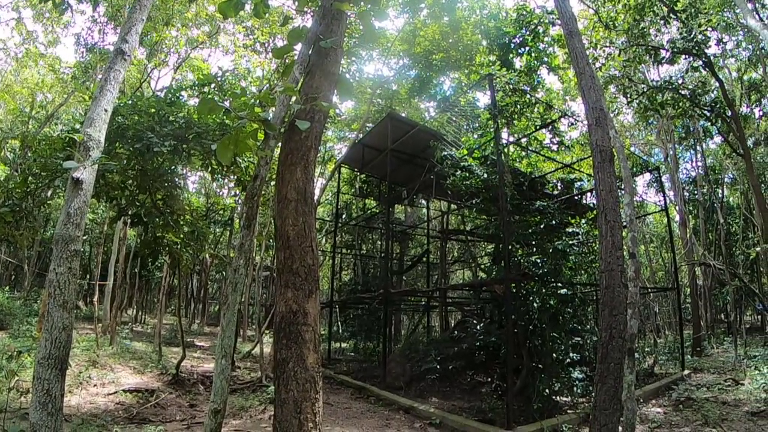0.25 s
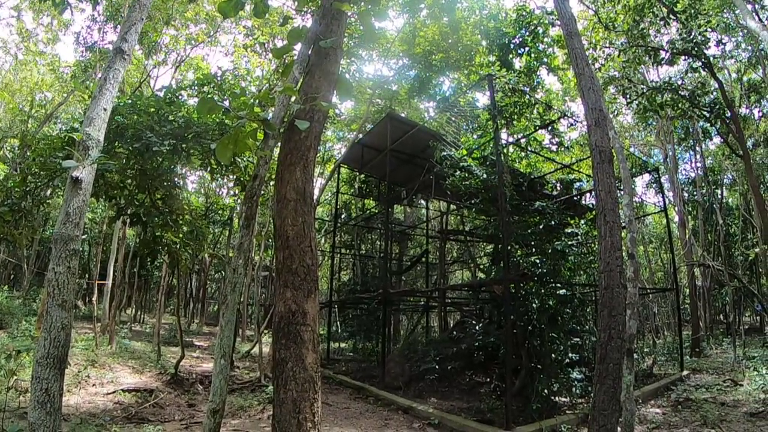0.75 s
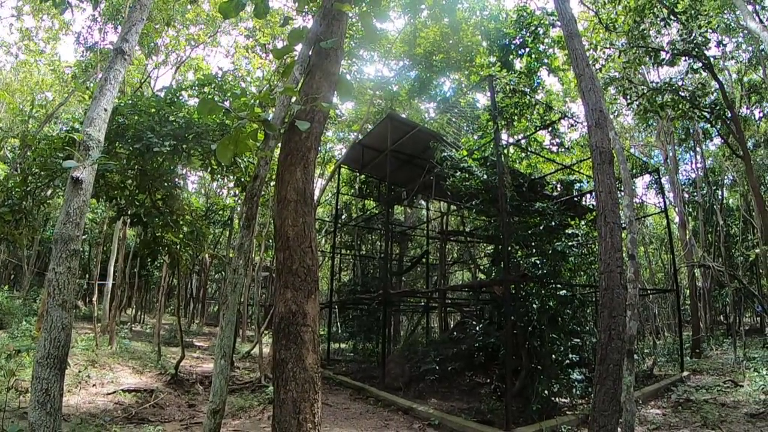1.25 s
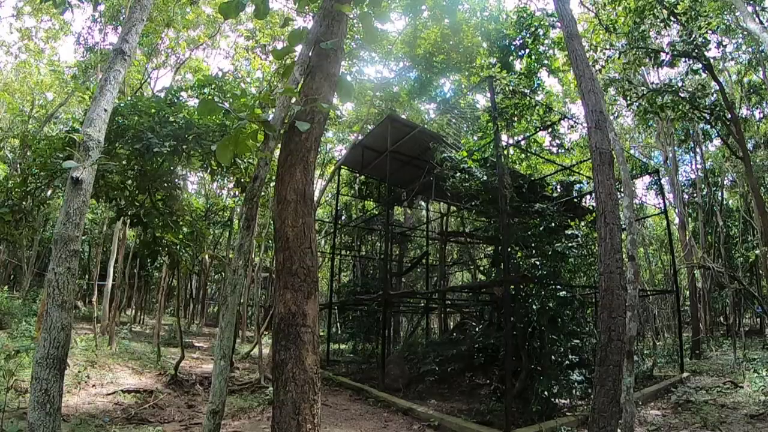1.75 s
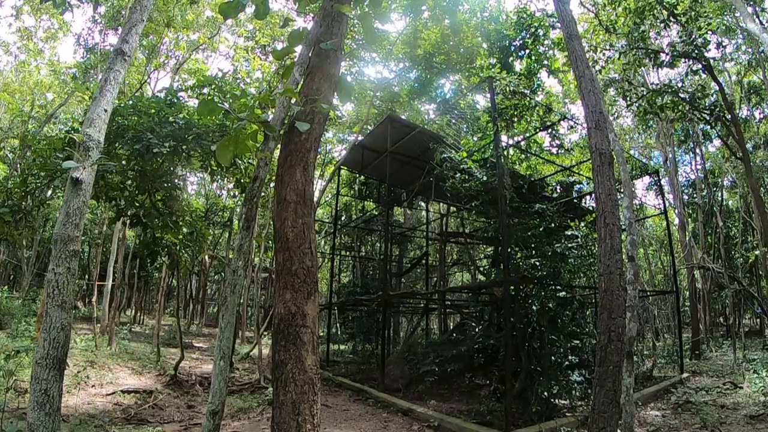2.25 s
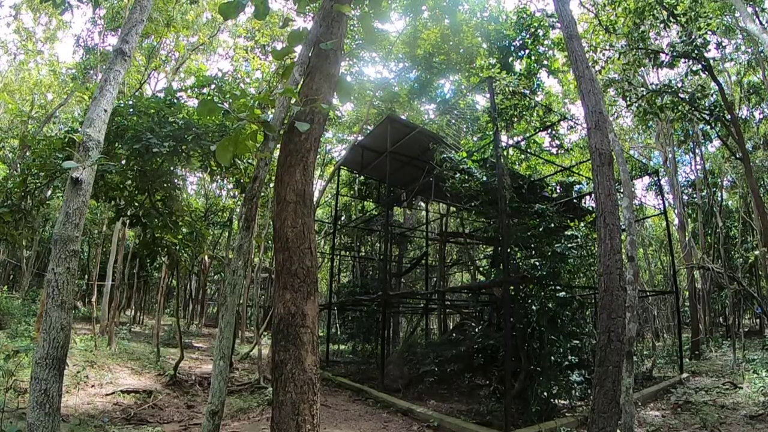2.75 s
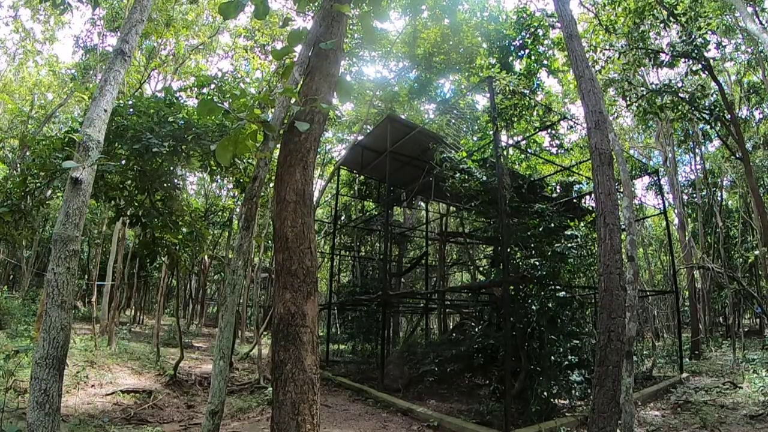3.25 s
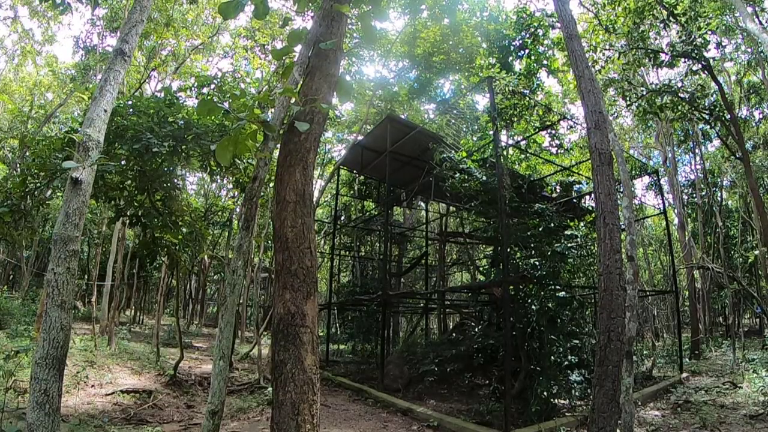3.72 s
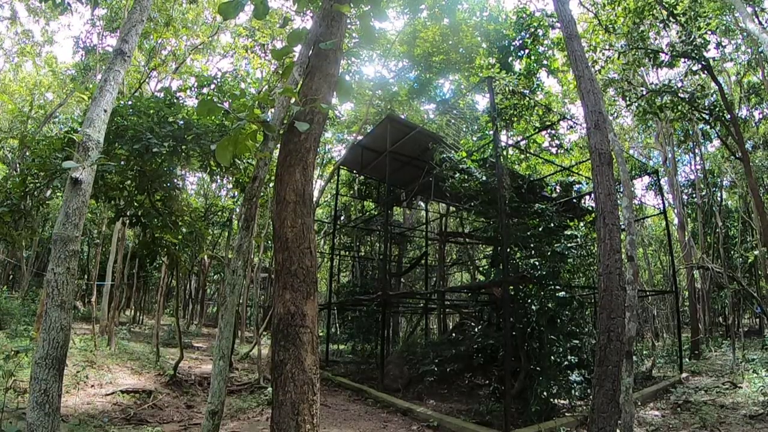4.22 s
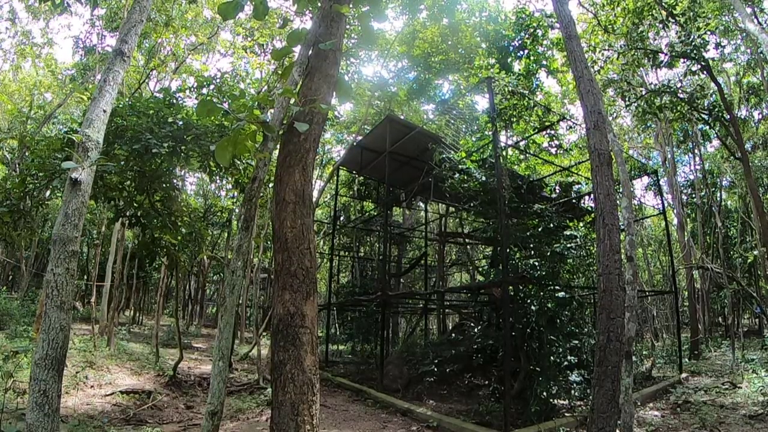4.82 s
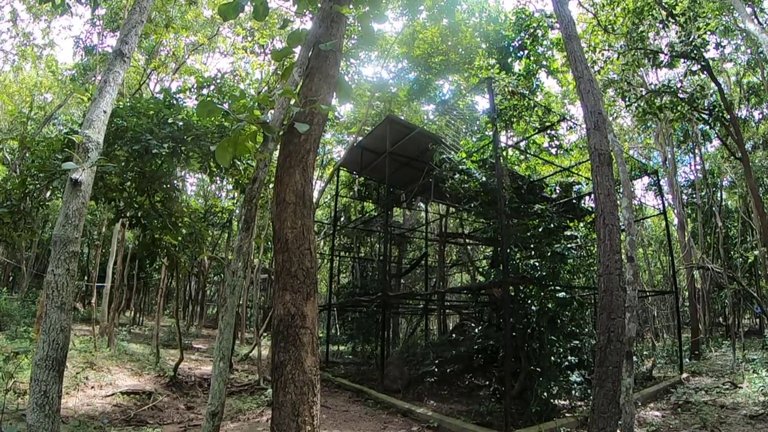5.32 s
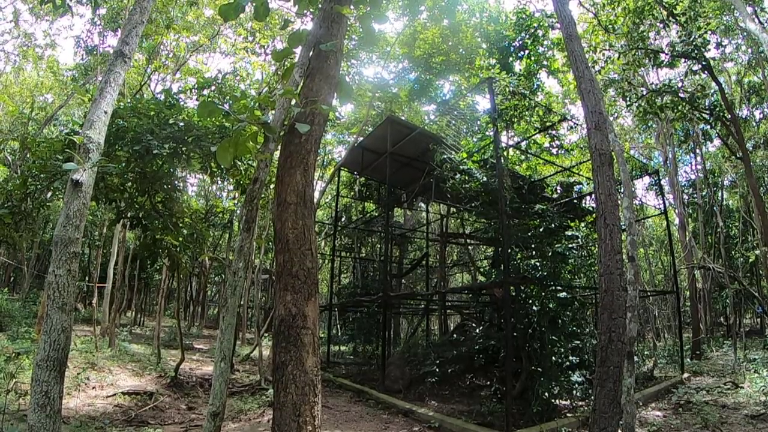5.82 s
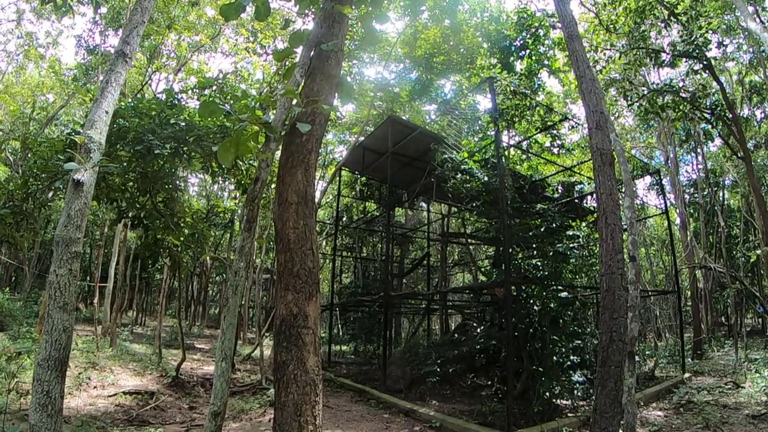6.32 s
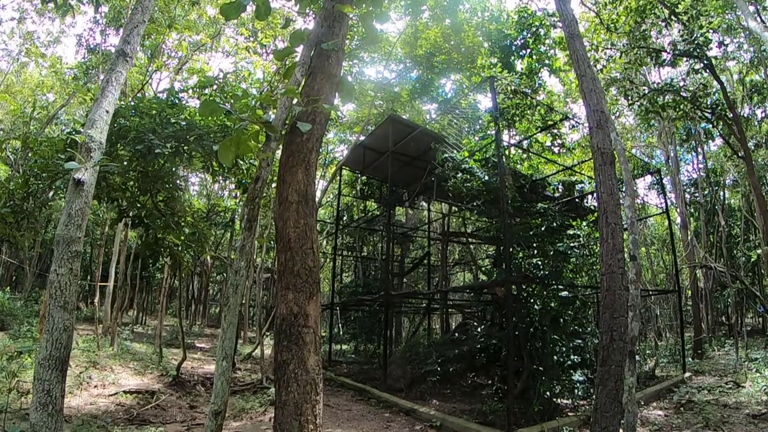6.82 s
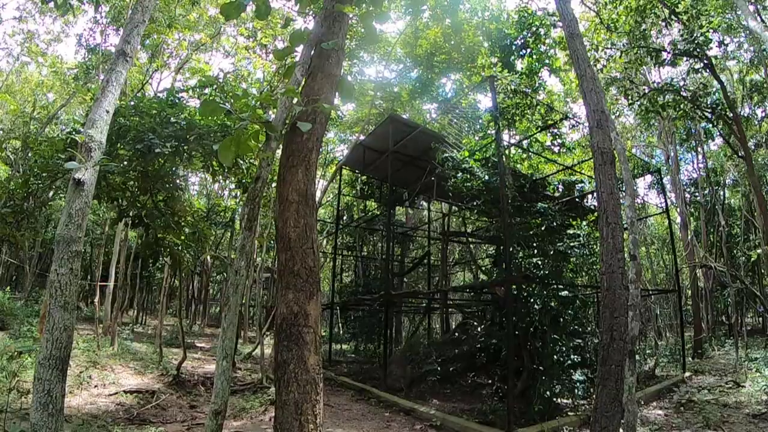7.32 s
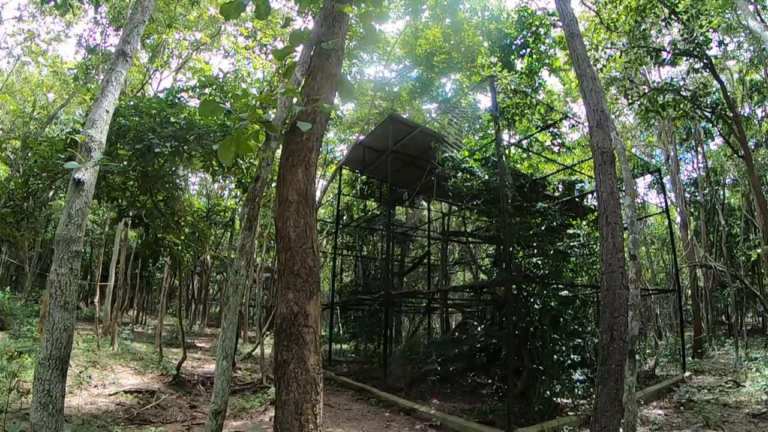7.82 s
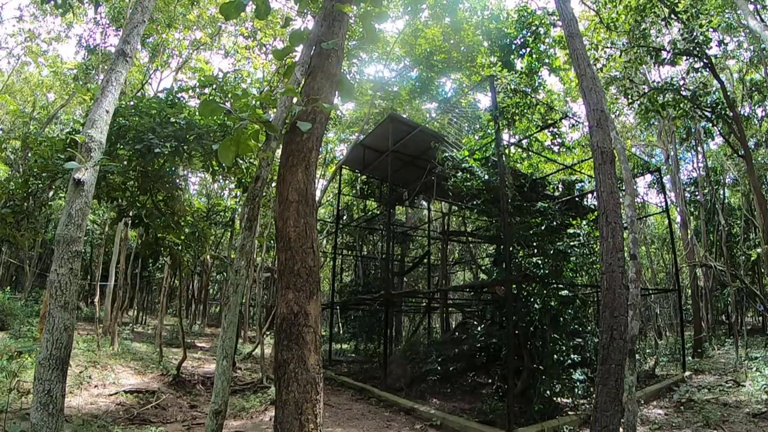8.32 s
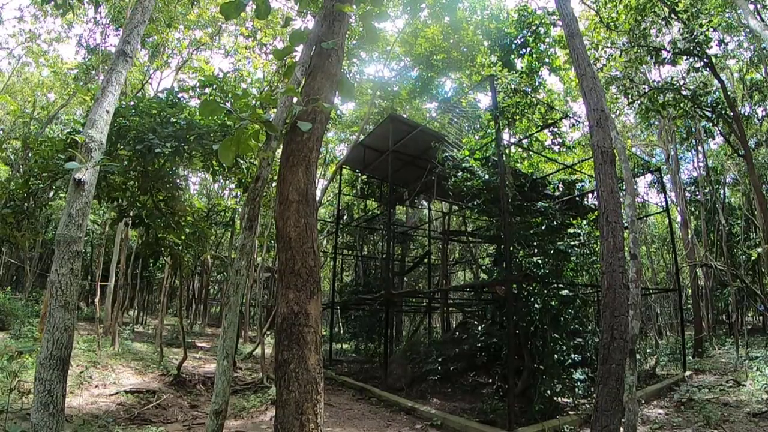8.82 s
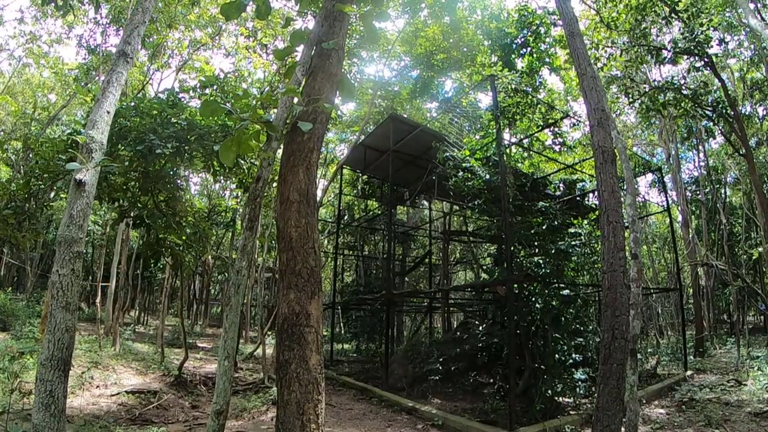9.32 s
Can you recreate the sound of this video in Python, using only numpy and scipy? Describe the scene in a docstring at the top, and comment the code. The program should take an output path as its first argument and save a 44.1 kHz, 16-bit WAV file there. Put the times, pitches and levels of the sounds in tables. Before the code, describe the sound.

In a forest enclosure, a close gibbon starts at once with a fast trill of upward flicks, about twelve per second, slightly slowing and fading by 0.8 s. A held, sinking hoot follows at 0.9 s, then loud arching hoots at 1.6, 2.3 and 3.1 s, slightly right. Short whoops rise and fall further right from 0.6 to 3.9 s, while thinner, higher wails and sliding notes answer from the left. From 4.0 to 5.4 s a softer trill runs on the left in two swells, with one high hoot at 4.6 s. Then isolated hoots: high at 5.9, low at 6.6, high at 7.1, low at 7.7, high at 8.2 s. Calls are nearly pure tones with echoing forest tails. Quiet leaf hiss fades, low breeze rumble wavers, and small microphone bumps occur between 4.4 and 7.8 s. Calls are absent at the end.

```python
"""Gibbons sing in a forest enclosure. A close one trills, then hoots; others wail from the left and whoop beside it.
A softer trill follows from the left, with one hoot during it and more after, and soft microphone bumps; leaves
hiss, air rumbles. Voices are gliding sines with weak overtones shaped by the throat. Trunks and cage return delayed
copies, the forest a noise tail. Bumps are short low-pitched pulses; air, leaves and rumble are coloured noise of
drifting level."""
import sys
import numpy as np
from scipy import signal
from scipy.fft import rfft, irfft, next_fast_len
from scipy.io import wavfile
from scipy.ndimage import uniform_filter1d, minimum_filter1d

SR = 44100
rng = np.random.default_rng(int(sys.argv[2]) if len(sys.argv) > 2 else 0)


def wrap_up_sound(samples):
    """Save the sound to the file named by the first command line argument, as 16-bit audio."""
    columns = np.atleast_2d(samples).T
    # keep every value between -1 and 1, then stretch to whole-number steps
    tamed = np.clip(columns, -1, 1)
    steps = np.round(tamed * 32767).astype(np.int16)
    wavfile.write(sys.argv[1], SR, steps)


N = 421596
TIME = np.arange(N) / SR


def from_db(db):
    """Decibels to amplitude gain."""
    return 10 ** (np.asarray(db) / 20)


def rms_one(x):
    """Scale to unit rms."""
    return x / np.sqrt(np.mean(x ** 2) + 1e-20)


def at_hz(points, hz):
    """Interpolate a table on a log-frequency axis."""
    known_hz, values = np.transpose(points)
    return np.interp(np.log(np.maximum(hz, 1)), np.log(known_hz), values)


def at_time(points):
    """Interpolate a (time, value) table over the whole scene."""
    return np.interp(TIME, *np.transpose(points))


def drift(rate):
    """Smooth random wander of rms 1, with 2 * rate knots per second."""
    knots = rng.standard_normal(N // 20)
    return rms_one(np.interp(TIME * rate * 2, np.arange(len(knots)), knots))


# Close trill: slightly slowing run of pulses, each weaker; call levels are before the mix
TRILL_START_S, TRILL_GAP_S, TRILL_SLOWING_S = .0265, .0813, .0008  # slowing: growth of each gap
TRILL_DB, TRILL_LOSS_DB, TRILL_HZ = -10.5, 0.36, 774.5  # loss is per pulse
# One late pulse: start_s, level_db
LATE_FLICK = [(.763, -24.5)]
# Throat resonances of both trills: freq_hz, level_db (re fundamental)
TRILL_THROAT = [(2400, -35.5), (3400, -46), (4300, -58.5), (5200, -43.5), (8000, -67)]


def trill_pulses(count):
    """Pulse times and levels of a trill that slows and fades."""
    k = np.arange(count)
    times_s = TRILL_START_S + TRILL_GAP_S * k + TRILL_SLOWING_S * k * (k - 1) / 2
    return list(zip(times_s, TRILL_DB - TRILL_LOSS_DB * k))


def close_trill():
    """Close gibbon's trill: fast upward flicks of pitch."""
    notes = flicks(trill_pulses(count=7) + LATE_FLICK, TRILL_HZ, octaves_per_s=13,
                   attack_s=0.01, release_s=0.011, roundness=1.26,
                   second_db=-26.5, mouth_db=16, mouth_hz=1790, mouth_width_hz=170)
    return sing(notes, TRILL_THROAT, jitter=0.009, fade_s=0.0021, press=2)


# Held note: start_s, length_s, pitch_hz, slide_hz_per_s, final_bend_hz, level_db, swell_db (over the note),
# second_harmonic_db
LONG_HOOT = [(.93, .214, 824.8, -300, 358, -14, -5, -13.5)]
# Arched notes: start_s, rise_s, hold_s, fall_s, first_hz, crest_hz, last_hz, level_db, swell_db (over the note),
# second_harmonic_db
CLOSE_HOOTS = [(1.627, 0.035, 0.016, 0.22, 578, 902.5, 322, -13, 6, -10),
               (2.294, 0.063, 0.017, 0.12, 528, 904, 356, -12.5, 11, -8.5),
               (3.074, 0.055, 0.007, 0.118, 497, 884, 443, -14.5, 7, -6)]
# Throat resonances: freq_hz, level_db (re fundamental)
CLOSE_THROAT = [(1500, -28), (2700, -31), (3500, -35), (4200, -49), (4900, -44), (5700, -42), (7200, -52),
                (8100, -45), (10500, -60)]


def close_hoots():
    """Close gibbon's hoots: one held note, then arches that weaken away from the crest."""
    held = holds(LONG_HOOT, scoop_share=0.18, attack_s=0.0076, slack_db=30, bright_db=30)
    arched = arches(CLOSE_HOOTS, rise_curve=2.1, fall_curve=1.84, attack_s=0.0053,
                    slack_db=45.5, slack_octaves=0.59, mouth_db=4, mouth_hz=1800, mouth_width_hz=85)
    return sing(held + arched, CLOSE_THROAT, jitter=0.0015, fade_s=.003, press=3)


# Arched notes: columns as CLOSE_HOOTS
WHOOPS = [(0.627, 0.069, 0.0, 0.026, 825, 1285, 995, -21.5, -10, -20.5),
          (0.808, 0.048, 0.011, 0.04, 929, 1251, 890, -22, 3.5, -19),
          (1.193, 0.059, 0.04, 0.044, 999, 1311, 945, -21.2, 4, -22),
          (1.912, 0.073, 0.0073, 0.076, 861, 1324, 982, -20.5, 2, -19),
          (2.631, 0.06, 0.022, 0.072, 847, 1288, 857, -20.0, 4.5, -19.5),
          (3.697, 0.1, 0.0015, 0.073, 669, 1329, 583, -15.5, 6, -19)]
# Throat resonances: freq_hz, level_db (re fundamental)
WHOOP_THROAT = [(2200, -25), (3400, -23), (4000, -31), (4600, -46), (6400, -41), (8000, -49), (10500, -54)]


def whoops():
    """Second gibbon: short arched notes that weaken away from the crest."""
    notes = arches(WHOOPS, rise_curve=2.01, fall_curve=1.83, attack_s=.0027,
                   slack_db=27, slack_octaves=0.59, mouth_db=12.5, mouth_hz=2173, mouth_width_hz=347)
    return sing(notes, WHOOP_THROAT, jitter=.006, fade_s=0.0044, press=0.41)


# Held notes: columns as LONG_HOOT
HELD_WAILS = [(0.376, 0.26, 937, -439, -170, -31.5, -7, -9.5),
              (0.616, 0.28, 844.5, 49.5, 598, -28, 6.5, -17), (1.52, 0.15, 1035, -1002, -29, -22, 6, -13.5),
              (2.124, 0.17, 1018, -550, 163, -22, 0, -16), (2.701, 0.135, 1012, -61.5, 86.5, -22, 11, -9.5),
              (3.332, 0.11, 985.4, -265, -10.5, -22.5, 11, -15.5),
              (3.473, 0.042, 963, -28.5, 48, -18, 2, -16)]
# Arched notes: columns as CLOSE_HOOTS
ARCHED_WAILS = [(0.02, 0.037, 0.014, 0.044, 1144, 1384, 1080, -34, -7, -18.5),
                (1.046, 0.034, 0.0029, 0.12, 1396, 1648, 1223, -25.5, 14, -24),
                (1.482, 0.052, 0.0011, 0.068, 786, 874, 797, -27, 3, -35),
                (1.824, 0.042, 0.013, 0.083, 1466, 1623, 1210, -26, 23.5, -27.5),
                (1.983, 0.036, 0, 0.033, 741, 856, 861, -25, -6, -25),
                (2.436, 0.028, 0.005, 0.104, 1400, 1653, 1283, -22.5, 11, -23),
                (2.964, 0.029, 0.021, 0.084, 1256, 1446, 1207, -22.5, 4, -23),
                (3.666, 0.062, 0.046, 0.054, 1066, 1445, 1304, -28, 14, -28.5)]
# Throat resonances: freq_hz, level_db (re fundamental)
WAIL_THROAT = [(2700, -39), (3300, -36), (4000, -27), (4500, -41), (5900, -34), (6900, -39), (7500, -47),
               (8200, -43), (10500, -57)]


def wails():
    """Answering wails: sliding held notes among arches."""
    held = holds(HELD_WAILS, scoop_share=.1, attack_s=0.0042, slack_db=9, bright_db=19)
    arched = arches(ARCHED_WAILS, rise_curve=1.87, fall_curve=1.69, attack_s=.0083,
                    slack_db=12.5, slack_octaves=0.35, mouth_db=14.5, mouth_hz=2500, mouth_width_hz=440)
    return sing(held + arched, WAIL_THROAT, jitter=0.0006, fade_s=0.005, press=2.4)


SOFT_TRILL_HZ = 822
# Pulses: peak_s, level_db
SOFT_TRILL = [(4.025, -40.5), (4.142, -22), (4.249, -27), (4.339, -22), (4.425, -19.5), (4.512, -21),
              (4.6, -23), (4.69, -27), (4.857, -26), (4.946, -22.5), (5.036, -19.5), (5.126, -21.5),
              (5.216, -22), (5.309, -27), (5.4, -29.5)]


def soft_trill():
    """Softer trill: steeper flicks with a quick release."""
    notes = flicks(SOFT_TRILL, SOFT_TRILL_HZ, octaves_per_s=23,
                   attack_s=0.014, release_s=0.0053, roundness=1.25,
                   second_db=-23.5, mouth_db=28, mouth_hz=2093, mouth_width_hz=272)
    return sing(notes, TRILL_THROAT, jitter=0.0048, fade_s=0.0046, press=1.4)


# Arched notes: columns as CLOSE_HOOTS
LATE_HOOTS = [(4.603, 0.075, 0.003, 0.038, 970, 1290, 989, -25, -9, -37),
              (5.894, 0.035, 0.0094, 0.1, 1157, 1442, 857, -20, 17, -19.5),
              (7.054, 0.036, 0.04, 0.069, 1220, 1382, 940, -21, 2.5, -19.5),
              (8.232, 0.034, 0.039, 0.061, 1202, 1401, 1111, -21, 6.5, -20)]
# Throat resonances: freq_hz, level_db (re fundamental)
LATE_THROAT = [(3000, -46), (4200, -36), (5600, -44), (7000, -43), (8400, -47), (10500, -53)]


def late_hoots():
    """High hoots, one during the soft trill and the rest after: arches with a soft attack."""
    notes = arches(LATE_HOOTS, rise_curve=1.93, fall_curve=1.81, attack_s=0.018,
                   slack_db=37.5, slack_octaves=0.41, mouth_db=10.0, mouth_hz=2460, mouth_width_hz=185)
    return sing(notes, LATE_THROAT, jitter=0.001, fade_s=0.0069, press=3)


# Held notes: columns as LONG_HOOT
LOW_HOOTS = [(6.577, 0.188, 760, 20, 146, -27.5, 19, -24.5),
             (7.662, 0.15, 798.4, -26.5, 60.6, -26, 5.5, -25)]
# Throat resonances: freq_hz, level_db (re fundamental)
LOW_THROAT = [(2350, -39), (3200, -48), (3850, -32), (4250, -26), (4700, -49), (6300, -42), (7500, -57)]


def low_hoots():
    """Low hoots among the late ones: held notes bending up at the end."""
    notes = holds(LOW_HOOTS, scoop_share=0.068, attack_s=0.012, slack_db=51.5, bright_db=31.5)
    return sing(notes, LOW_THROAT, jitter=0.0005, fade_s=0.0076, press=3)


def flicks(pulses, pitch_hz, octaves_per_s, attack_s, release_s, roundness,
           second_db, mouth_db, mouth_hz, mouth_width_hz):
    """Upward flicks, 10 dB down attack_s before and release_s after the peak; second harmonic peaks at mouth_hz."""
    t = np.linspace(-.034, .022, 57)
    hz = pitch_hz * 2 ** (octaves_per_s * t)
    bell_db = -10 * np.abs(t / np.where(t < 0, attack_s, release_s)) ** roundness
    mouth = mouth_db * np.exp(-((2 * hz - mouth_hz) / mouth_width_hz) ** 2)
    return [np.c_[s + t, hz, db + bell_db, second_db + mouth] for s, db in pulses]


def arches(rows, rise_curve, fall_curve, attack_s, slack_db, slack_octaves, mouth_db, mouth_hz, mouth_width_hz):
    """Notes swoop to a crest, hold, fall; voice slackens off the crest, second harmonic peaks at mouth_hz."""
    notes, u = [], np.linspace(0, 1, 80)
    for start, rise, hold, fall, first_hz, crest_hz, last_hz, db, swell_db, second_db in rows:
        t = u * (rise + hold + fall)
        rising = np.maximum(1 - t / rise, 0) ** rise_curve
        falling = np.maximum((t - rise - hold) / fall, 0) ** fall_curve
        hz = crest_hz + (first_hz - crest_hz) * rising + (last_hz - crest_hz) * falling
        octaves = np.abs(np.log2(crest_hz / hz))
        slack = slack_db * np.tanh((octaves / slack_octaves) ** 1.614)
        level_db = db + swell_db * (u - .5) - slack - 20 * np.exp(-t / attack_s)
        mouth = mouth_db * np.exp(-((2 * hz - mouth_hz) / mouth_width_hz) ** 2)
        notes.append(np.c_[start + t, hz, level_db, second_db + mouth])
    return notes


SCOOP_S, UPTURN_S = .012, .02  # time constants: settling on pitch, final bend


def holds(rows, scoop_share, attack_s, slack_db, bright_db):
    """Notes scoop up to a held pitch; the voice weakens and brightens, per octave, as it leaves that pitch."""
    notes, u = [], np.linspace(0, 1, 80)
    for start, length, pitch_hz, slide, upturn_hz, db, swell_db, second_db in rows:
        t = u * length
        held_hz = pitch_hz + slide * t
        scoop = 1 - scoop_share * np.exp(-t / SCOOP_S)
        hz = held_hz * scoop + upturn_hz * np.exp((t - length) / UPTURN_S)
        octaves = np.abs(np.log2(hz / held_hz))
        level_db = db + swell_db * (u - .5) - slack_db * octaves - 20 * np.exp(-t / attack_s)
        notes.append(np.c_[start + t, hz, level_db, second_db + bright_db * octaves])
    return notes


SHIMMER_DB = 2  # rms wander of the overtones


def sing(notes, throat, jitter, fade_s, press):
    """A nearly pure tone glides through each note; weak overtones sweep through the throat's resonances."""
    out = np.zeros(N)
    waver = 1 + jitter * (drift(35) + drift(250))
    flutter = from_db(SHIMMER_DB * drift(40))
    for note in notes:
        s, hz, level_db, second_db = np.transpose(note)
        span = slice(max(int(s[0] * SR), 0), int(s[-1] * SR))
        t = TIME[span]
        pitch = uniform_filter1d(np.interp(t, s, hz), size=len(t) // 10, mode="nearest")
        phase = 2 * np.pi * np.cumsum(pitch * waver[span]) / SR
        effort = np.minimum(pitch / np.median(pitch), 1) ** press  # voice slackens as the pitch drops
        # the mouth opens and closes
        second = from_db(np.interp(t, s, second_db)) * np.sqrt(effort) * np.sin(2 * phase)
        orders = range(3, int(throat[-1][0] / hz.max()) + 1)
        high = effort * sum(from_db(at_hz(throat, k * pitch)) * np.sin(k * phase) for k in orders)
        edge_s = np.minimum(t - t[0], t[-1] - t)
        gate = np.sin(np.pi / 2 * np.clip(edge_s / (2 * fade_s), 0, 1)) ** 2
        tone = np.sin(phase) + flutter[span] * (second + high)
        out[span] += gate * from_db(np.interp(t, s, level_db)) * np.sqrt(2) * tone
    return out


def gibbons():
    """Each call has a direction and its own share of direct sound and forest echo."""
    trill, hoots, whoop, wail = close_trill(), close_hoots(), whoops(), wails()
    soft, late, low = soft_trill(), late_hoots(), low_hoots()
    direct = (place(from_db(5.5) * trill + from_db(3.0) * hoots, pan_db=-4.5, lead_ms=-0.072)
              + place(from_db(2.5) * whoop, pan_db=-9, lead_ms=-0.0084)
              + place(from_db(1.0) * wail, pan_db=11, lead_ms=0.22)
              + place(from_db(1.6) * late + from_db(-2.0) * low, pan_db=12.5, lead_ms=.26)
              + place(from_db(1.5) * soft, pan_db=6.5, lead_ms=0.17))
    scattered = (from_db(-3.5) * trill + from_db(-6) * hoots + from_db(0.5) * whoop + from_db(1.5) * wail
                 + from_db(-0.5) * late + from_db(2.5) * low + soft)
    straight = through_leaves(direct + from_db(-5.5) * trunk_echoes(scattered), corner_hz=6800)
    return straight + from_db(3.5) * forest(scattered, build_s=0.015, early_db=4.5, early_s=.08)


def place(x, pan_db, lead_ms):
    """Direct sound: louder and earlier on the source's side (positive = left)."""
    right = np.interp(TIME - lead_ms / 1000, TIME, x)
    return np.array([x * from_db(pan_db / 2), right * from_db(-pan_db / 2)])


# Echoes off nearby trunks and the cage: delay_s, level_db (before the mix), left_over_right_db
TRUNKS = [(.011, -11, 5), (.019, -4, -2.5), (.032, -4, 3.5), (.044, -6.5, -5), (.059, -18, 5),
          (.074, -7, -2), (.093, -14.5, -1.5), (.118, -21.5, -0.5)]


def trunk_echoes(x):
    """A few distinct reflections, each panned to its own side."""
    out = np.zeros((2, N))
    for delay_s, db, pan_db in TRUNKS:
        lag = int(delay_s * SR)
        out[:, lag:] += from_db([[db + pan_db / 2], [db - pan_db / 2]]) * x[:N - lag]
    return out


def through_leaves(x, corner_hz):
    """Foliage takes treble out of the straight paths: first-order lowpass."""
    return signal.sosfilt(signal.butter(1, corner_hz, fs=SR, output="sos"), x)


# Forest echo decay: freq_hz, t60_s
FOREST_T60 = [(400, 2.2), (800, 1.166), (1400, 1.223), (2400, 1.2), (3600, 1.1), (6000, 2.1), (11000, 0.45)]


def forest(x, build_s, early_db, early_s):
    """Dense scatter, strong at first, then a long noise tail; each band decays at its own rate."""
    t = TIME[:SR * 3 // 2]
    scatter = rfft(rng.standard_normal((2, len(t))))
    hz = np.fft.rfftfreq(len(t), 1 / SR)
    centres, t60s = np.transpose(FOREST_T60)
    response = 0
    for share, t60 in zip(np.eye(len(centres)), t60s):
        band = irfft(scatter * at_hz(np.c_[centres, share], hz), len(t))
        response = response + band * np.exp(-np.log(1000) * t / t60)
    shape = (1 - np.exp(-(t / build_s) ** 2)) * (1 + from_db(early_db) * np.exp(-t / early_s))
    energy = np.sum((shape * np.exp(-np.log(1000) * t / t60s.max())) ** 2)
    return signal.fftconvolve(x[None], response * shape / np.sqrt(energy), axes=1)[:, :N]


# Microphone bumps: centre_s, level_db (before panning), pitch_hz, length_s
BUMPS = [(4.425, -36, 208.7, 0.0015), (5.322, -44, 129.6, 0.0084), (5.541, -32.5, 77.8, 0.013),
         (5.983, -31, 113.9, 0.0016), (7.791, -23, 195.5, 0.0015), (7.814, -38, 59.4, .005)]


def bumps():
    """Each bump is a low cosine that swells and dies symmetrically about its centre."""
    out = np.zeros(N)
    for s, db, hz, length_s in BUMPS:
        t = TIME - s
        decay = np.minimum(np.hypot(t / length_s, 1) - 1, 20)
        out += from_db(db) * np.exp(-decay) * np.cos(2 * np.pi * hz * t)
    return place(out, pan_db=8.5, lead_ms=0)


# Leaf hiss spectrum: freq_hz, density_db (per Hz, relative)
LEAVES = [(1500, -1.5), (3000, 2.5), (5500, -7.5), (7500, -11.5), (9500, -11), (11000, -24.5),
          (13000, -46.5)]
# Rustling: time_s, level_db
RUSTLE = [(0, -49), (1, -56.5), (2.5, -48.5), (3.6, -53.5), (3.95, -50), (4.5, -53), (5.4, -57),
          (5.8, -61.5), (7.3, -57.5), (7.55, -59), (8.0, -61.5), (9.56, -68)]


def leaves():
    """Leaf hiss: coloured noise whose level follows the rustling and flickers."""
    return from_db(at_time(RUSTLE) + drift(29)) * coloured_noise(LEAVES)


AIR_DB = -56
# Forest air spectrum: freq_hz, density_db (per Hz, relative)
AIR = [(100, -15.5), (170, -4), (280, -10.5), (400, -15.5), (700, -11), (1500, -9.5), (2500, -13.5),
       (5000, -21.5), (9700, -37.5), (11000, -55.5), (13000, -55.5)]


def air():
    """Forest air: broadband noise of slowly wandering level."""
    return from_db(AIR_DB + 2.0 * drift(1.9)) * coloured_noise(AIR)


# Low air spectrum: freq_hz, density_db (per Hz, relative)
RUMBLE = [(10, -19), (22, -2), (45, -2), (70, -13.5), (105, -16.5), (160, -11), (300, -23.5), (600, -50)]
# Breeze: time_s, level_db (before gusts and panning)
BREEZE = [(0, -62), (1.2, -55.5), (1.7, -65), (3.2, -58), (4.2, -52), (4.8, -54), (5.3, -46.5),
          (6.2, -52.5), (7, -52), (8.2, -55.5), (9.1, -50.5), (9.56, -46)]


def rumble():
    """Low stirring of the air: bass noise following the breeze and its gusts, a little to the left."""
    gusts_db = 3 * drift(6)
    return from_db(at_time(BREEZE) + gusts_db) * coloured_noise(RUMBLE) * from_db([[1.5], [-1.5]])


def coloured_noise(spectrum):
    """Stereo noise: white noise weighted by a spectrum, rms 1."""
    size = next_fast_len(N)
    white = rfft(rng.standard_normal((2, size)))
    weight = from_db(at_hz(spectrum, np.fft.rfftfreq(size, 1 / SR)))
    return rms_one(irfft(white * weight, size)[:, :N])


def scene():
    """Singers and microphone bumps over a quiet bed of leaves, air and rumble."""
    return gibbons() + bumps() + leaves() + air() + rumble()


CUTOFF_HZ = 12400


def record(dry):
    """A fast limiter holds the loudest peaks down; the top is cut steeply."""
    needed = np.minimum(1, .9 / (np.abs(dry).max(axis=0) + 1e-9))
    gain = uniform_filter1d(minimum_filter1d(needed, size=400), size=400)
    return signal.sosfilt(signal.ellip(10, .1, 80, CUTOFF_HZ, fs=SR, output="sos"), dry * gain)


dry = scene()
out = record(dry)
wrap_up_sound(out)
```